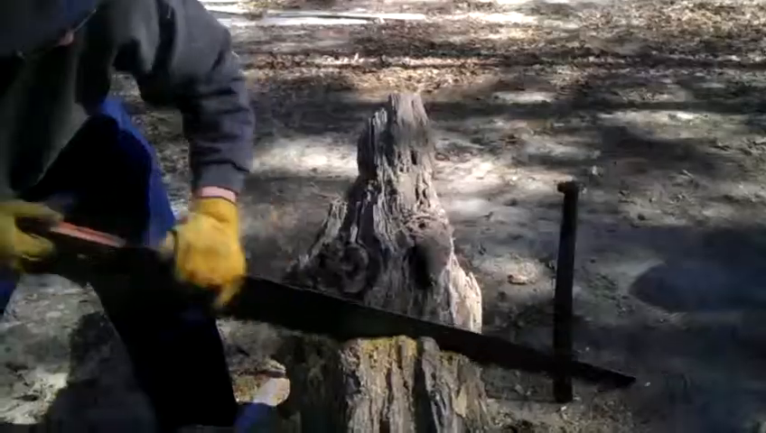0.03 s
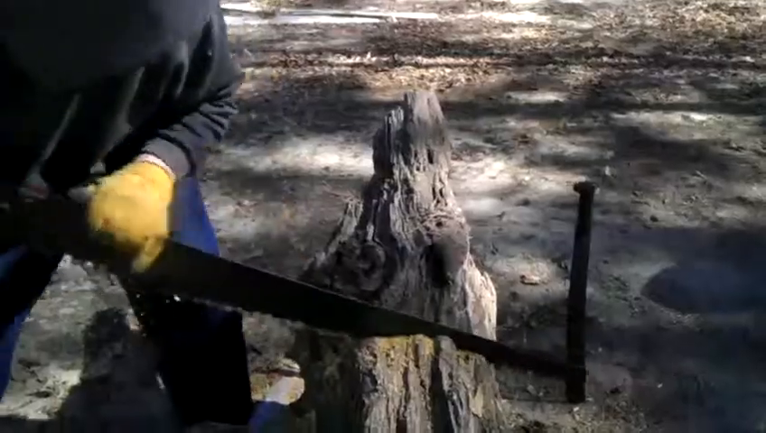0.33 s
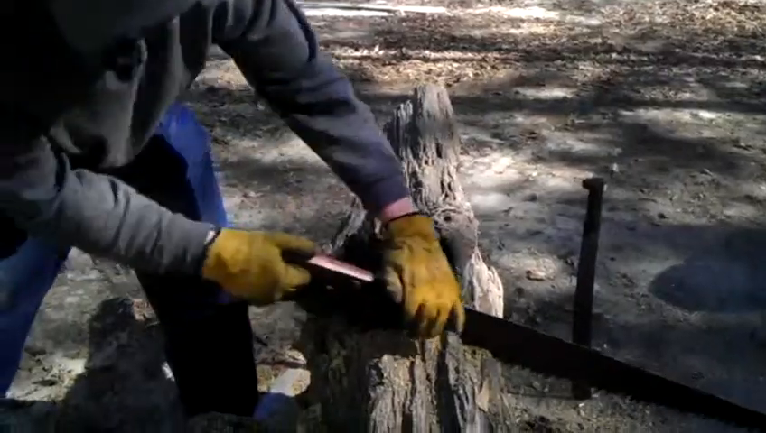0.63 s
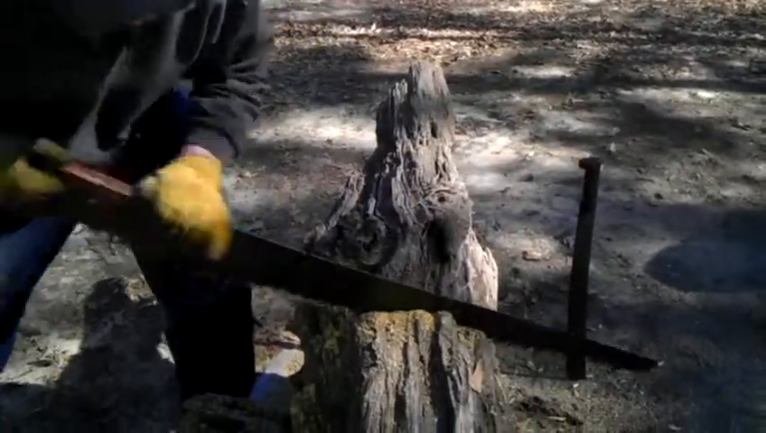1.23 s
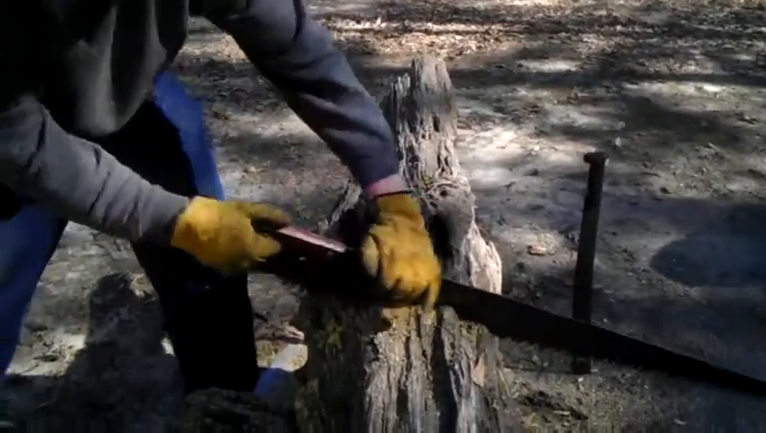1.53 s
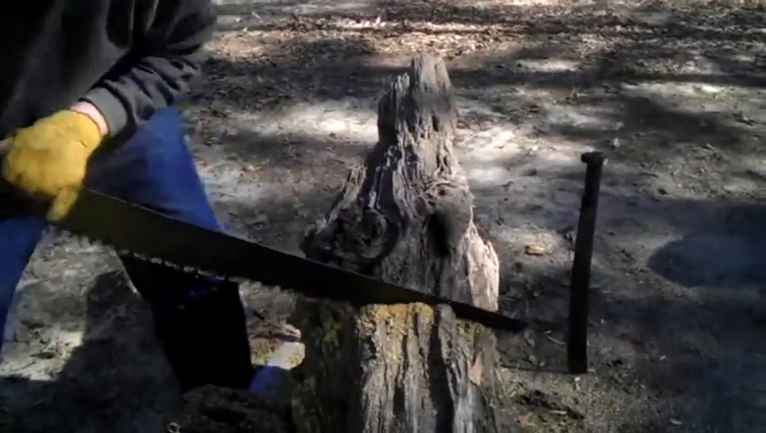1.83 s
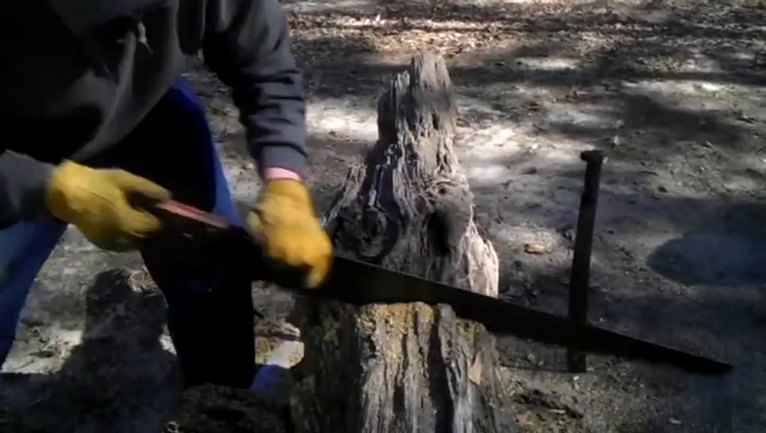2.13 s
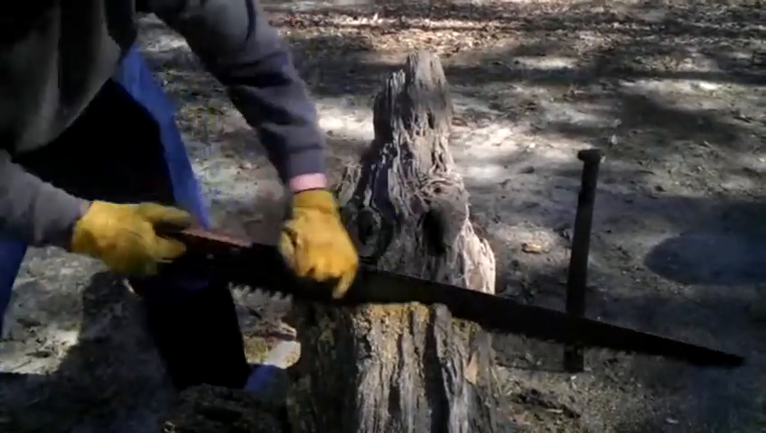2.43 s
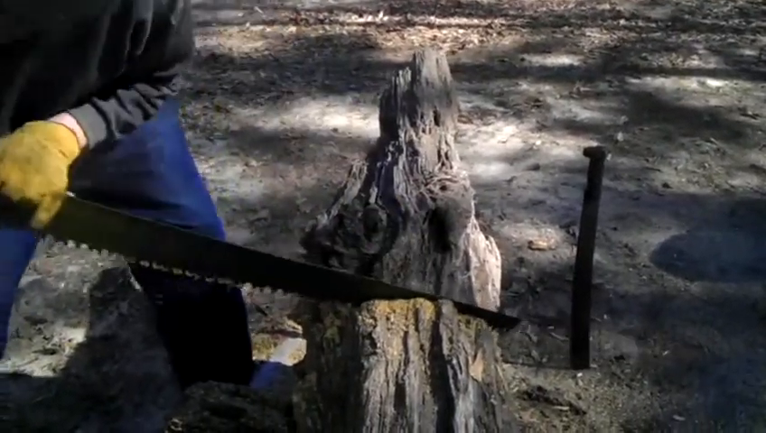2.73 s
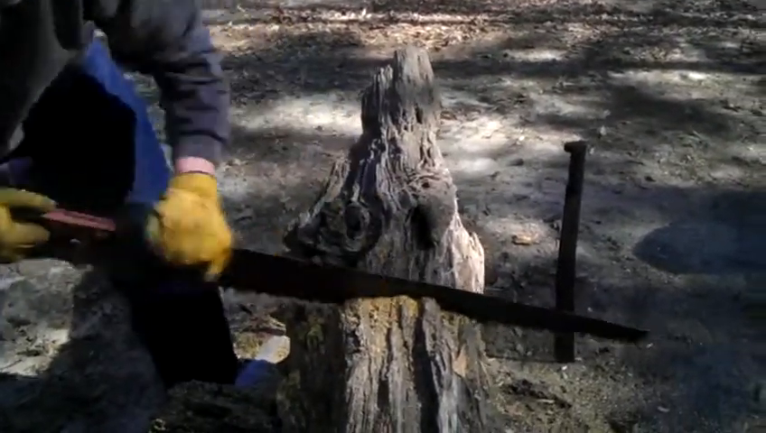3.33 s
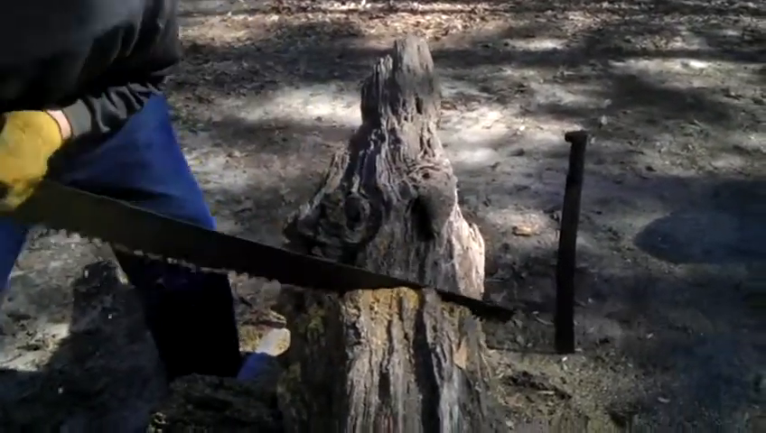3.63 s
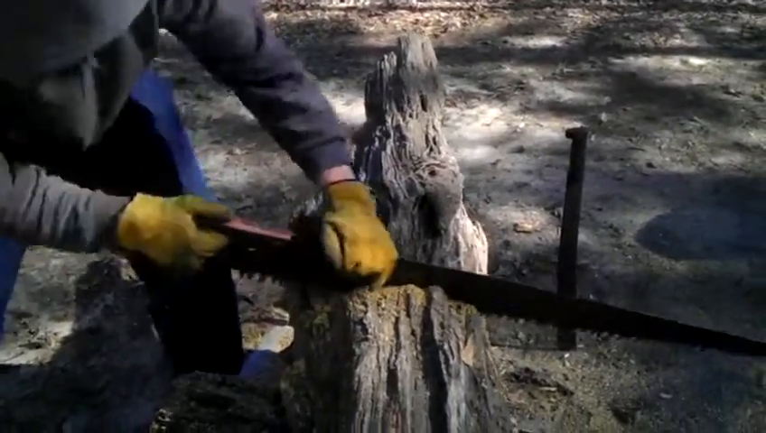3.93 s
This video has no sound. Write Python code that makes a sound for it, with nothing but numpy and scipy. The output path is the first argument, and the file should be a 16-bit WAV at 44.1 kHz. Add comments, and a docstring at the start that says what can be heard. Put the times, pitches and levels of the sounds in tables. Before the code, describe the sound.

Close, steady hand sawing of a thick stump in quiet open air. Pulls and pushes alternate with a hissing, crunching rasp, the steel blade catching and juddering at times, and a bright, falling rip closes every push.

```python
"""Sawing a stump by hand

A big crosscut saw is pulled and pushed through a stump outdoors, five times to and fro. The faster
it moves, the more its teeth tear the wood, which hisses and shakes the log, the cut and the steel.
Mid-stroke the wood crunches and groans; each push ends in a bright, falling rip. Now and then a tooth
snags or the blade judders. The ground gives one quick echo and the trees a faint tail."""
import sys
import numpy as np
from scipy import signal
from scipy.fft import rfft, irfft
from scipy.io import wavfile
from scipy.ndimage import uniform_filter1d

SR = 44100
rng = np.random.default_rng(int(sys.argv[2]) if len(sys.argv) > 2 else 0)


def generate_wav(sig):
    """Save sig (samples, or channels by samples) to the path in sys.argv[1] as 16-bit PCM at SR."""
    pcm = np.round(np.clip(np.atleast_2d(sig).T, -1, 1) * 32767).astype(np.int16)
    wavfile.write(sys.argv[1], SR, pcm)


N = 176400

# Pulls and pushes in turn. fastest_at (0-1) says where in the stroke the blade is fastest.
# Columns: start_s, length_s, fastest_at, log_db, cut_db, blade_db, hiss_db (levels before trimming)
STROKES = [(-.06, 0.53, 0.43, -31.5, -24.5, -22.5, -22.5), (0.364, 0.32, 0.5, -28, -26, -24.5, -18.5),
           (0.74, 0.42, .51, -30, -26.5, -25, -19), (1.149, 0.37, .6, -27.5, -25, -21, -16.5),
           (1.58, .41, .54, -31.5, -25.5, -23.5, -19), (1.994, 0.37, 0.59, -28, -27.5, -22, -16),
           (2.412, .415, .52, -33.5, -24, -23, -19), (2.839, .34, 0.56, -25, -24.5, -23.5, -15.5),
           (3.19, 0.46, .62, -30.5, -26.5, -25.5, -18.5), (3.668, .34, 0.65, -27.5, -25, -21.5, -17)]
# The tone of the log, the cut, the steel blade and the hiss. Columns: pitch_hz, level_db
LOG_TONE = [(40, -56), (85, -27), (150, -10), (200, -4.5), (300, 3), (400, -1), (500, -2.5), (620, -18),
            (1200, -40)]
CUT_TONE = [(400, -32.5), (620, -10.5), (760, 0.5), (870, 5), (1020, -0.5), (1220, 0), (1500, -3.5),
            (1900, -3.5), (3000, -36.5)]
BLADE_TONE = [(1200, -43), (1900, -8.5), (2150, 0), (2300, 2), (2450, 5.5), (2620, 0), (2850, -4),
              (3300, -10.5), (5000, -47.5)]
HISS_TONE = [(1200, -34.5), (2500, -4), (3300, -7.5), (4100, -0.5), (4700, -4.5), (5200, 2.5), (5800, -8),
             (6500, -2), (7500, 2.5), (8700, 2), (9700, -5.5), (10800, -11), (12400, -6), (14000, -10)]
# A tooth catches in the wood. Columns: start_s, hiss_db, blade_db, knock_db (levels before trimming)
SNAGS = [(0.0912, -11, -11, -14.5), (0.1197, -19, -9.5, -24), (.147, -20, -8, -32),
         (0.1762, -16.5, -2.5, -32), (.208, -17, -11, -38), (0.3075, -32, -7, -30), (.317, -19, -5, -24),
         (.331, -28, -7.5, -23), (0.408, -17.5, -19, -34), (0.472, -25, -4.5, -16.5),
         (.496, -16, -6.5, -28), (0.532, -17, -8, -23), (0.5547, -13, -29, -39), (0.837, -18.5, -11.5, -38),
         (.955, -13, -10, -31), (.982, -18.5, -3, -12), (1.333, -14, -16, -16.5), (1.3969, -10, -36, -36),
         (1.641, -21.5, -21, -19), (1.787, -17.5, -7.5, -16.5), (1.833, -17.5, -10, -27),
         (1.858, -19, -12, -23), (1.8841, -32, -9.5, -25), (2.1041, -13, -18, -20), (2.132, -7, -6, -14.5),
         (2.564, -30, -26, -13.5), (2.5944, -16, -17, -16), (2.6712, -11, -12, -13.5),
         (2.7641, -21.5, -8, -37), (2.9141, -14, -27, -22.5), (2.949, -12.5, -9.5, -25),
         (3.4519, -15, -7, -20), (3.4724, -23, -13, -17), (3.5611, -22, 2, -21), (3.57, -13, 1, -13),
         (3.589, -17.5, -7, -17.5), (3.708, -30.5, -25.5, -45), (3.875, -16, -9.5, -14)]
# The teeth dig in late in each push. Columns: start_s, length_s, rip_db, zing_db
DIGS = [(0.526, 0.12, -18.5, -30), (1.392, 0.09, -16, -32.5), (2.195, 0.13, -18.5, -41),
        (3.031, 0.094, -18.5, -26), (3.884, 0.094, -18, -28)]
# The bright tone of that rip. Columns: pitch_hz, level_db
RIP_TONE = [(1500, -0.5), (3500, -4), (5200, 0), (5900, 0.5), (7500, 10.5), (8800, 13), (10500, -7),
            (12500, 7), (14000, -25)]
# The teeth crunch through the wood mid-stroke. Columns: start_s, length_s, level_db
CRUNCHES = [(0.406, 0.18, -19), (0.786, 0.34, -24), (1.238, 0.18, -19), (1.732, 0.18, -20),
            (2.11, .17, -21.5), (2.534, 0.21, -19), (2.909, .18, -18.5), (3.309, 0.3, -20.5),
            (3.792, 0.15, -21)]
# The tone of the crunch. Columns: pitch_hz, level_db
CRUNCH_TONE = [(200, -33.5), (450, -6), (620, -5.5), (900, 7), (1750, -1), (2500, 9), (3200, -2),
               (4800, -4), (10000, -23.5)]
# Saw and log groan together. Columns: start_s, length_s, from_hz, to_hz, level_db
GROANS = [(0.049, 0.16, 307, 389, -32.5), (0.259, 0.12, 274, 400, -29.5), (0.836, 0.14, 420, 220, -29.5),
          (1.713, .12, 260, 405, -28), (2.085, 0.12, 357, 170, -27), (2.509, 0.14, 415.2, 211.7, -25.5),
          (2.934, 0.19, 216.4, 176.6, -29), (3.313, 0.12, 350.5, 320, -29.5),
          (3.737, 0.27, 266, 198.8, -35.5)]
# The blade judders in the cut. Columns: start_s, length_s, pitch_hz, level_db
JUDDERS = [(0.565, 0.014, 340, -24), (1.386, 0.028, 315, -14), (2.162, 0.11, 900.3, -21.5),
           (2.272, 0.024, 880.4, -17), (3.455, 0.013, 1139, -14), (3.59, 0.03, 860, -24)]
# The blade scrapes the side of the cut at some turns. Columns: start_s, length_s, level_db
SCRAPES = [(0.65, 0.12, -41), (2.788, 0.1, -37), (3.146, 0.11, -42)]
# The tone of the scrape. Columns: pitch_hz, level_db
SCRAPE_TONE = [(500, -7), (1200, -6), (2000, 1.5), (2450, -1), (3300, -17), (4600, -1), (5300, -16),
               (7500, -15), (11000, -24)]
# How long the sound from the trees takes to fade by 60 dB. Columns: pitch_hz, fade_s
TREE_FADE = [(150, 0.52), (1000, 0.18), (3000, 0.18), (12000, 0.061)]
# The tone of the outdoor air. Columns: pitch_hz, level_db
AIR_TONE = [(25, -47), (45, -32), (70, -16), (105, -0.5), (170, -2), (330, -1.5), (600, -9.5), (900, -12.5),
            (1600, -26), (2400, -15), (3500, -26), (4800, -26), (7000, -24), (14000, -36)]
# Stereo width: what differs between left and right, against what they share. Columns: pitch_hz, width_db
STEREO_WIDTH = [(30, -9), (70, -11), (130, -33), (300, -30.5), (650, -14.5), (1100, -23.5), (1600, -2.5),
                (2000, -2), (2500, -6), (3800, -9), (5200, -2.5), (6500, 0), (8000, -1), (14000, -1.5)]
# How much louder the microphone's left side is than its right. Columns: pitch_hz, balance_db
MIC_BALANCE = [(100, -2), (1200, 0.5), (1600, -3.5), (1950, -1), (2400, -5), (3400, 0), (4500, 0.5),
               (5200, 3), (5900, 0.5), (7200, 5.5), (8600, -4), (9900, -5.5), (10900, -10), (13000, -1.5)]

SNAG_RISE_S = 0.0006


def saw():
    """Rubbing and biting teeth shake the log, the cut and the blade, and hiss: faster is louder."""
    progress, speed = stroke_motion()
    bites, snaps = tooth_bites(speed.max(0)), fibre_snaps()
    log_db, cut_db, blade_db, hiss_db = np.array(STROKES).T[3:, :, None]
    snag_hiss, snag_blade, snag_wood = snags()

    def force(level_db, speed_power, late_db, bite_mix, snap_mix, trim_db):
        """The push on one part; late_db tilts its level from the start of a stroke to the end."""
        each_stroke = amp(level_db + trim_db + late_db * (progress - .5)) * speed ** speed_power
        swell = np.sqrt((each_stroke ** 2).sum(0))
        roughness = abs(1 - bite_mix + bite_mix * bites) * abs(1 - snap_mix + snap_mix * snaps)
        return swell * unit(roughness)

    log = force(log_db, speed_power=.93, late_db=5.5, bite_mix=.9, snap_mix=.16, trim_db=-1.5)
    cut = force(cut_db, speed_power=1.1, late_db=4, bite_mix=1, snap_mix=.57, trim_db=-1.6)
    blade = force(blade_db, speed_power=1.3, late_db=-.5, bite_mix=.36, snap_mix=.33, trim_db=-.2)
    hiss = force(hiss_db, speed_power=1.39, late_db=-2, bite_mix=.63, snap_mix=.055, trim_db=-1.37)
    # hypot adds the energy of the snags to that of the strokes
    return (ring(np.hypot(log, amp(-7.5) * snag_wood), LOG_TONE)
            + ring(np.hypot(cut, amp(-1.5) * snag_wood), CUT_TONE)
            + ring(np.hypot(blade, amp(-8.5) * snag_blade), BLADE_TONE)
            + ring(np.hypot(hiss, amp(2.5) * snag_hiss), HISS_TONE))


def stroke_motion(flatten=1.15):
    """Each stroke's progress and speed, both 0-1: the blade speeds up, then slows for the turn."""
    start, length, fastest_at = np.array(STROKES).T[:3, :, None]
    progress = progress_through(start, length)
    skew = np.log(.5) / np.log(np.clip(fastest_at, .2, .8))  # moves the top of the arch to fastest_at
    arch = abs(np.sin(np.pi * progress ** skew))
    return progress, np.tanh(flatten * arch ** 1.15) / np.tanh(flatten)


def tooth_bites(speed, teeth_per_s=120, jitter=.4, spread_db=2.4):
    """Teeth hit the wood unevenly, more often at speed; each bites with its own force and lets go."""
    teeth_passed = np.cumsum(teeth_per_s * speed * np.exp(jitter * drift(40))) / SR
    strength = amp(spread_db * np.clip(rng.standard_normal(4096), -2, 2))
    letting_go = np.exp(-(teeth_passed % 1))
    return unit(strength[teeth_passed.astype(int) % len(strength)] * letting_go)


def fibre_snaps(snaps_per_s=1200, fade_s=.0025):
    """Tearing wood fibres make many tiny snaps, a few stronger than the rest."""
    strength = amp(np.minimum(rng.exponential(1, N), 4))
    snaps = strength * (rng.random(N) < snaps_per_s / SR)
    energy = signal.lfilter([1], [1, -np.exp(-2 / (fade_s * SR))], snaps ** 2)
    return unit(np.sqrt(energy))


def snags(fall_s=.0064):
    """A catching tooth gives a short jolt. Returns its force on the hiss, the blade and the wood."""
    out, t = np.zeros((3, N)), np.arange(SR // 20) / SR
    jolt = (1 - np.exp(-t / SNAG_RISE_S)) * np.exp(-(t / fall_s) ** 2)
    for start, *levels_db in SNAGS:
        part = out[:, round(start * SR):][:, :len(t)]
        part += amp(levels_db)[:, None] * jolt[:part.shape[1]] / jolt.max()
    return out


def digs(from_hz=4170, to_hz=3370, upper_ratio=1.335, width_hz=420):
    """Teeth dig in at the end of a push: a bright rip, and a two-note zing that falls as the saw slows."""
    start, length, rip_db, zing_db = np.array(DIGS).T[:, :, None]
    progress = progress_through(start, length)
    swell = abs(np.sin(np.pi * progress)) ** .41
    pitch_hz = from_hz + (to_hz - from_hz) * (progress % 1).sum(0)  # % 1 drops the finished digs
    lower = resonate(rng.standard_normal(N), pitch_hz, width_hz)
    upper = resonate(rng.standard_normal(N), pitch_hz * upper_ratio, width_hz)
    zing = (amp(zing_db) * swell).sum(0) * (lower + amp(2) * upper)
    rip = ring((amp(rip_db) * swell).sum(0) * unit(1 + fibre_snaps()), RIP_TONE)
    return rip + zing


def uneven_wood(sound, spread_db=2):
    """Each bit of wood rasps a little differently: random louder and softer patches in time and pitch."""
    spectrum = signal.stft(sound, nperseg=512, noverlap=384)[2]
    patches = rng.standard_normal(spectrum.shape[1:])
    for _ in range(2):
        patches = uniform_filter1d(patches, size=8, axis=1)  # smooth over time
        patches = uniform_filter1d(patches, size=6, axis=0, mode="constant")  # smooth over pitch
    gain = unit(amp(spread_db * unit(patches)))
    return signal.istft(spectrum * gain, nperseg=512, noverlap=384)[1][:, :N]


def crunches(cracks_per_s=210, jitter=.5, crack_share=.4, splinter_s=.0025):
    """Deep teeth break off chips quickly and unevenly: each is a sharp crack, then brief splintering."""
    rate = cracks_per_s * np.exp(jitter * drift(cracks_per_s / 2))
    chips_broken = np.floor(np.cumsum(rate) / SR)
    cracks = np.diff(chips_broken, prepend=0) * rng.uniform(.57, 1, N)
    decay = np.exp(-2 / (splinter_s * SR))
    splinters = signal.lfilter([1 - decay], [1, -decay], cracks ** 2)
    force = unit(np.sqrt(crack_share * cracks ** 2 + (1 - crack_share) * splinters))
    return ring(swells(CRUNCHES) * force, CRUNCH_TONE)


def groans(width_hz=55):
    """Saw and log ring with a low boom that glides in pitch as the blade slides through."""
    out = np.zeros(N)
    for start, length, from_hz, to_hz, level_db in GROANS:
        progress = progress_through(start, length)
        swell = np.sin(np.pi * progress)
        pitch_hz = from_hz + (to_hz - from_hz) * progress
        boom = swell * resonate(rng.standard_normal(N), pitch_hz, width_hz)
        out += amp(level_db) * boom * np.linalg.norm(swell) / np.linalg.norm(boom)
    return out


def twangs(main_hz=2349, spread=.05, fall_s=.0045, trim_db=-5.5):
    """Each snag rings the steel near its main note, and the wood muffles it at once."""
    t, out = np.arange(SR // 20) / SR, np.zeros(N)
    shape = (1 - np.exp(-t / SNAG_RISE_S)) * np.exp(-t / fall_s)
    pitches_hz = main_hz * (1 + spread * rng.uniform(-1.07, 1, len(SNAGS)))
    for (start, _, blade_db, _), pitch_hz in zip(SNAGS, pitches_hz):
        note = shape / shape.max() * np.sin(2 * np.pi * pitch_hz * t)
        part = out[round(start * SR):][:len(t)]
        part += amp(blade_db + trim_db) * note[:len(part)]
    return out


def judders(waver=.06, roughness=.51):
    """The blade sticks and slips for a moment, giving a short, rough, wavering note."""
    out = np.zeros(N)
    wavering_time = np.cumsum(1 + waver * drift(132)) / SR
    for start, length, pitch_hz, level_db in JUDDERS:
        swell = np.sin(np.pi * progress_through(start, length))
        out += amp(level_db) * swell * np.sqrt(2) * np.sin(2 * np.pi * pitch_hz * wavering_time)
    return out * unit(1 + roughness * drift(88))


def scrapes():
    """The flat of the blade rubs faintly on the wood as the saw turns back."""
    return ring(swells(SCRAPES), SCRAPE_TONE)


def outdoor_echoes(sound, echo_s=.005, echo_db=-22, tail_db=-15):
    """The ground sends back one quick echo, and the trees a faint, fading tail."""
    hz, t, noise = signal.stft(rng.standard_normal(SR // 2), SR, nperseg=256)
    fade = amp(-60 * t / look_up(TREE_FADE, hz)[:, None])
    tail = signal.istft(noise * fade, SR, nperseg=256)[1]
    response = amp(tail_db) * tail / np.linalg.norm(tail)
    response[0] += 1  # the direct sound
    response[round(echo_s * SR)] += amp(echo_db)
    return signal.fftconvolve(sound, response[None], axes=1)[:, :N]


def background(air_db=-39.5, hum_hz=103.6, hum_db=-55.5):
    """Outdoor air murmurs low, along with a faint, wavering hum."""
    wavering_time = np.cumsum(1 + .0314 * drift(7.1)) / SR
    hum = np.sqrt(2) * np.sin(2 * np.pi * hum_hz * wavering_time)
    air = ring(amp(.5 * drift(1)), AIR_TONE)
    return amp(air_db) * air + amp(hum_db) * hum


def ring(force, tone, size=4096):
    """A force shakes an object: stereo noise that follows the force and rings with the given tone."""
    # build the object's answer to one tap, with no ringing ahead of the tap (minimum phase)
    cepstrum = irfft(np.log(amp(look_up(tone, np.fft.rfftfreq(size, 1 / SR)))))
    cepstrum[1:size // 2] *= 2
    cepstrum[size // 2 + 1:] = 0
    tap = irfft(np.exp(rfft(cepstrum)))[:size // 2]
    noise = force * np.sign(rng.standard_normal((2, N)))
    ringing = signal.oaconvolve(noise, tap[None] / np.linalg.norm(tap), axes=1)[:, :N]
    # left and right share one noise; the other makes them differ
    width = amp(look_up(STEREO_WIDTH, np.fft.rfftfreq(N, 1 / SR)))
    shared, side = rfft(ringing) / np.hypot(1, width)
    return irfft([shared + width * side, shared - width * side], N)


def resonate(noise, pitch_hz, width_hz):
    """Keeps a narrow band of noise around a moving pitch, filtering twice for steep sides."""
    spin = np.exp(2j * np.pi * np.cumsum(pitch_hz) / SR)
    decay = np.exp(-np.pi * width_hz / SR)
    band = signal.lfilter([1], [1, -2 * decay, decay * decay], noise / spin)
    return unit((spin * band).real)


def swells(events):
    """A loudness curve that rises and falls once for each event."""
    start, length, level_db = np.array(events).T[:, :, None]
    return (amp(level_db) * np.sin(np.pi * progress_through(start, length))).sum(0)


def progress_through(start_s, length_s):
    """How far along an event is: 0 before it, rising to 1 at its end."""
    return np.clip((np.arange(N) / SR - start_s) / length_s, 0, 1)


def drift(rate_hz):
    """A smooth random wobble, mostly slower than rate_hz."""
    hz = np.fft.rfftfreq(N, 1 / SR)
    return unit(irfft(rfft(rng.standard_normal(N)) / (1 + (hz / rate_hz) ** 4), N))


def look_up(table, hz):
    """Reads between a table's rows, with pitch spaced by octaves."""
    pitches, values = np.transpose(table)
    return np.interp(np.log(hz + 1), np.log(np.sort(pitches)), values)


def amp(db):
    """Turns decibels into a gain."""
    return 10 ** (np.asarray(db) / 20)


def unit(x):
    """Scales a signal to an average (rms) level of 1."""
    return x / np.sqrt(np.mean(x ** 2) + 1e-20)


def scene():
    """All the sounds of sawing, with their echoes, over the outdoor background."""
    rasp = uneven_wood(saw() + digs())
    sawing = rasp + crunches() + groans() + twangs() + judders() + scrapes()
    return outdoor_echoes(sawing) + background()


def record(dry, low_cut_hz=89, high_cut_hz=14100, silent_s=.071, ceiling=.81):
    """The microphone tints each side, opens a moment late, rounds peaks and trims the lows and highs."""
    hz = np.fft.rfftfreq(N, 1 / SR)
    lean_db = look_up(MIC_BALANCE, hz) / 2
    balance = amp([lean_db, -lean_db])
    balance /= np.sqrt((balance ** 2).mean(0))
    low_cut = 1 - 1 / (1 + (hz / low_cut_hz) ** 2)
    fade_in = np.clip((np.arange(N) / SR - silent_s) / .00049, 0, 1)
    sound = irfft(rfft(dry) * low_cut * balance, N) * fade_in
    rounded = sound / (1 + (sound / ceiling) ** 6) ** (1 / 6)
    high_cut = signal.firwin(401, high_cut_hz, window=("kaiser", 9), fs=SR)
    return signal.oaconvolve(rounded, high_cut[None], "same")


dry = scene()
out = record(dry)
generate_wav(out)
```